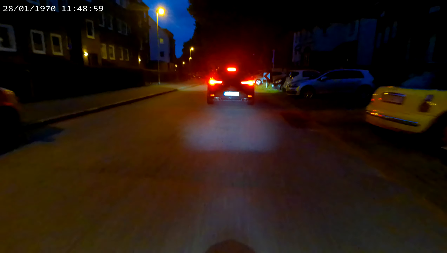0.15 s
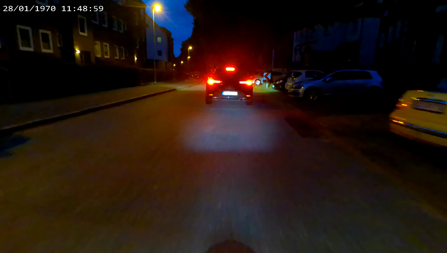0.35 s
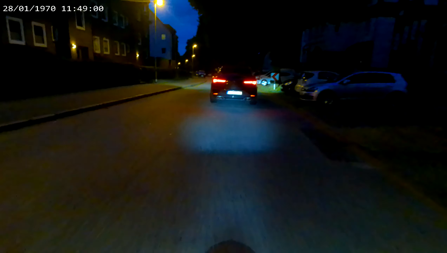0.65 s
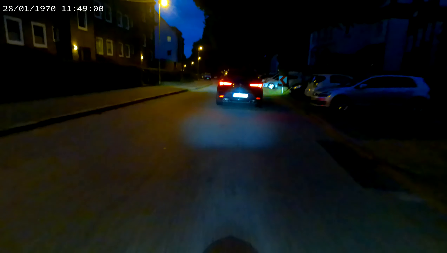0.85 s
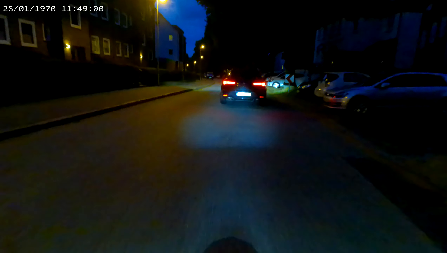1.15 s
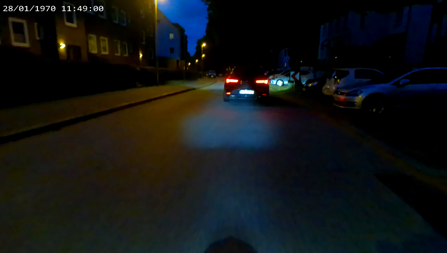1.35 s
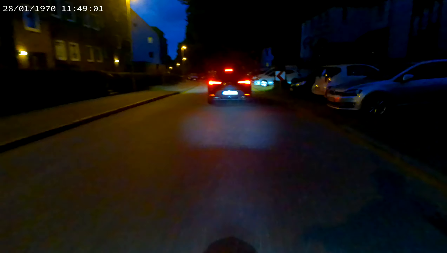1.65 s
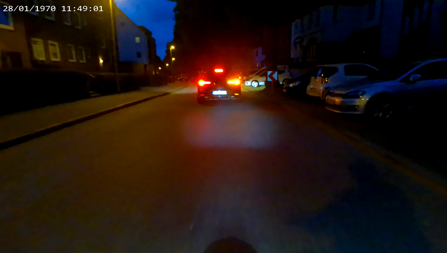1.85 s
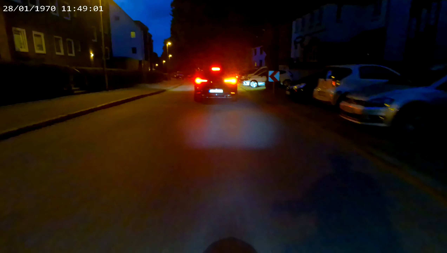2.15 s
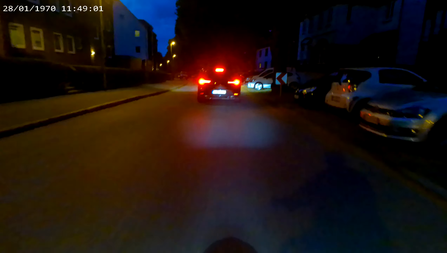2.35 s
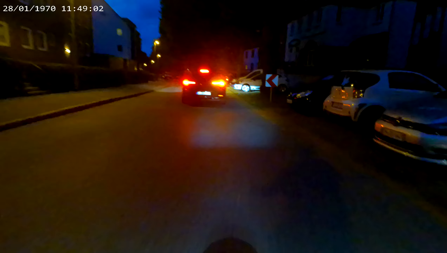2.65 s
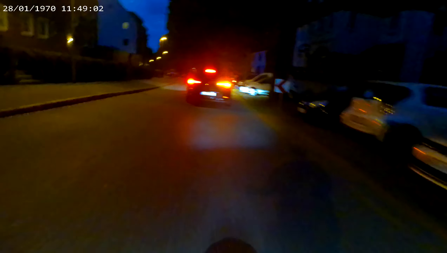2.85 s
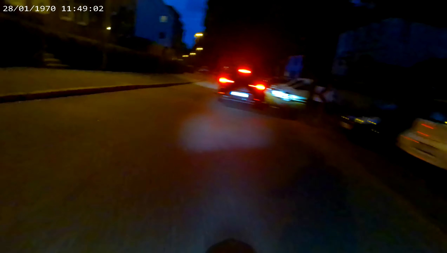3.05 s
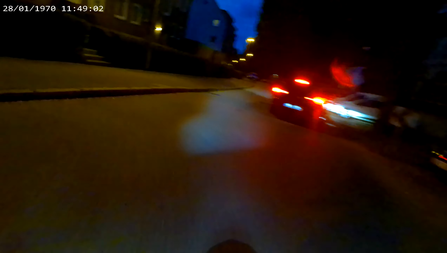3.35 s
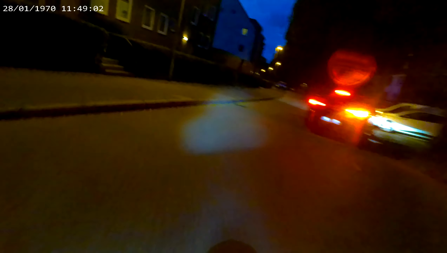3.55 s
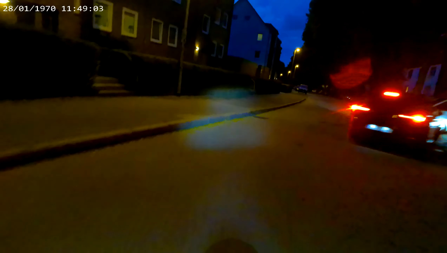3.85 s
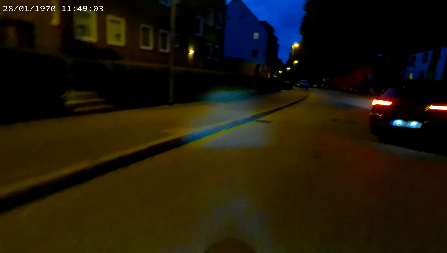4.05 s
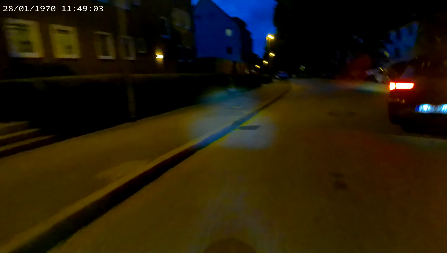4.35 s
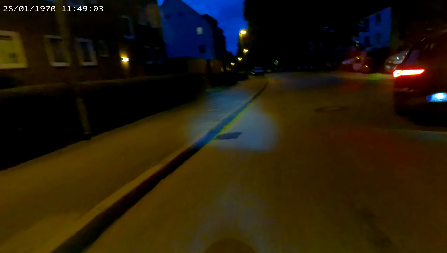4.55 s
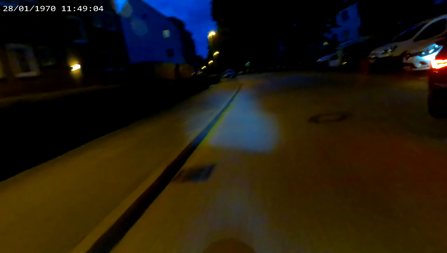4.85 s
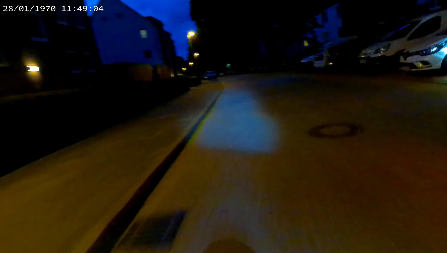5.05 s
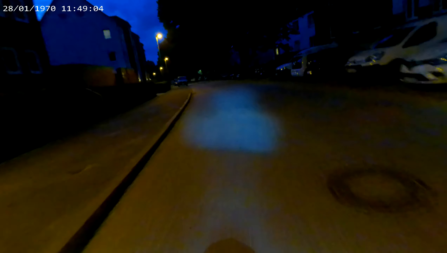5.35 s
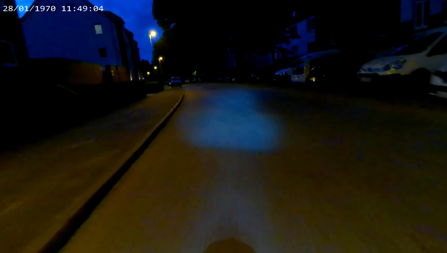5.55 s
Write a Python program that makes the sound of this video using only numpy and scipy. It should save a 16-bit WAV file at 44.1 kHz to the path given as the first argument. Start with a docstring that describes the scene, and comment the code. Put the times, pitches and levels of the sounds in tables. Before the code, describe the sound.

An electric bike rolls along a street with a low swelling hum, tyre rumble, wind, a brief brake rasp and a few knocks.

```python
"""A low, swelling hum: an electric bike rolls along a street at night, its tyres shaking an on-board camera.
Wind buffets the microphone. Early on a brake rasps and lets go with a thump; loose parts knock a few times.
Halfway through, the motor's drone comes up, sags, then climbs as the bike gathers speed.
The loudest swells overload the camera, whose own faint hiss and buzz lie under everything."""
import sys
import numpy as np
from scipy.fft import rfft, irfft, next_fast_len
from scipy.io import wavfile
from scipy.ndimage import map_coordinates

SR = 44100
rng = np.random.default_rng(int(sys.argv[2]) if len(sys.argv) > 2 else 0)


def generate_wav(signal):
    """Clip the signal to [-1, 1] and save it as 16-bit WAV at the path in sys.argv[1]."""
    frames = np.transpose(np.atleast_2d(signal))
    scaled = np.clip(frames, -1, 1) * 32767
    pcm = np.round(scaled).astype(np.int16)
    wavfile.write(sys.argv[1], SR, pcm)


N = 250929
TIME = np.arange(N) / SR

# Roughness of the asphalt. Each row: time in seconds, level in dB at which it keeps the mount humming.
ROUGHNESS = [(0.1, -18.5), (0.7, -23.5), (1.25, -19), (2.0, -21.5), (2.55, -18.5), (3.2, -20.5), (4.3, -19),
             (5.69, -19.5)]
# Tone of tread patter and brake scrape. Each row: frequency in Hz, relative level in dB.
SCRAPE_SPECTRUM = [(250, -36), (480, -8), (600, 1.5), (800, -4.5), (1500, -2), (1850, 1), (2050, -8.5),
                   (2450, -7.5), (2850, -15), (4500, -25.5), (7000, -60)]


def mount_hum(mode_hz=176.53, width_hz=48, wander_hz=3.5, flutter_db=5, max_swing=0.76):
    """The road keeps the camera mount ringing at one low mode, which swells with every bump."""
    # Uneven patches of road. Each row: centre in seconds, peak in dB, length in seconds.
    bumps = [(0.145, -9, 0.045), (0.22, -7.5, 0.028), (0.49, -12.5, 0.08), (0.855, -5.5, 0.08),
             (1.14, -8.5, 0.051), (1.23, -7.5, 0.056), (1.35, -7, 0.026), (1.53, -11, 0.052),
             (2.145, -9, 0.093), (2.28, -7.5, 0.043), (2.37, -11, 0.028), (2.64, -9.5, 0.092),
             (2.8, -11, 0.13), (2.93, -12, 0.071), (3.43, -9.5, 0.049), (3.62, -7, 0.019),
             (3.99, -10, 0.041), (4.14, -14, 0.25), (4.425, -4.5, 0.16), (4.648, -3.5, 0.05),
             (4.91, -6.5, 0.056), (5.06, -6, 0.11), (5.185, -2.5, 0.045), (5.266, -5, 0.049),
             (5.355, -6, 0.115), (5.488, -2.5, 0.045), (5.55, -4.5, 0.055), (5.64, -8, 0.073)]
    pitch_hz = mode_hz + wander_hz * wobble(16)
    asphalt = amp(curves(ROUGHNESS)[0] + flutter_db * wobble(26))
    swing = np.minimum(np.hypot(asphalt, swells(bumps)), max_swing)
    ring = swing * np.sin(2 * np.pi * np.cumsum(pitch_hz) / SR)
    # the mode needs a few cycles to build up and to die away
    return filtered(ring, lambda f: 1 / (1 + ((f - mode_hz) / width_hz) ** 4))


def tyres(roll_db=-21.5, drum_db=-48.5, drum_hz=430, drum_width_hz=220):
    """The tyres rumble, their casings drum and the tread patters on the asphalt; all grow with speed."""
    # The bike slows, then gathers speed. Each row: time in seconds, tread level in dB.
    pace = [(0, -41.5), (0.7, -40.5), (1.0, -43), (2.2, -43), (3.6, -40), (4.7, -38), (5.69, -34.8)]
    # Tone of the rumble. Each row: frequency in Hz, relative level in dB.
    roll_spectrum = [(30, -31.5), (60, -2.5), (100, 1.5), (135, 4), (160, 10), (178, 6), (200, 10),
                     (222, 4.5), (255, -2), (290, 0), (328, 0.5), (365, -13), (415, -12.5), (480, -21.5),
                     (800, -23), (1500, -55.5)]
    tread_db, = curves(pace)
    rough_db, = curves(ROUGHNESS)
    faster_db = tread_db - tread_db.mean()
    rougher_db = rough_db - rough_db.mean()
    roll_gain = amp(roll_db + 0.3 * faster_db + 0.36 * rougher_db + 1.35 * wobble(13))
    roll = roll_gain * coloured(noise(), roll_spectrum)
    casing = unit(filtered(noise(), lambda f: resonance(f, drum_hz, drum_width_hz) ** 3))
    drum = amp(drum_db + 2.1 * faster_db) * casing
    tread_gain = amp(tread_db + 1.2 * wobble(45))
    patter = coloured(housing(grains(rate=5000, spread_db=0.5)), SCRAPE_SPECTRUM)
    return roll + drum + tread_gain * patter


def wind(throb_hz=27, wander_hz=3, throb_lift_db=4.5):
    """Slow eddies push on the microphone, over a deep throb that swells in the gusts."""
    # Air on the microphone. Each row: time in seconds, buffet level in dB.
    airflow = [(0, -33), (0.6, -31), (1.4, -26.5), (2.1, -31.5), (3.2, -33), (4.4, -33), (5.1, -26.5),
               (5.69, -23.5)]
    # Gusts. Each row: centre in seconds, peak in dB, length in seconds.
    gusts = [(0.14, -18, 0.16), (1.03, -15, 0.35), (1.6, -10, 0.16), (4.83, -13, 0.12)]
    # Tone of the buffeting. Each row: frequency in Hz, relative level in dB.
    buffet_spectrum = [(10, -12), (25, 3.5), (43, 12.5), (58, 4.5), (110, -8), (300, -53)]
    eddy_db, = curves(airflow)
    pitch_hz = throb_hz + wander_hz * wobble(14)
    throb = unit(np.sin(2 * np.pi * np.cumsum(pitch_hz) / SR))
    depth = np.hypot(amp(eddy_db + throb_lift_db + 3 * wobble(26)), swells(gusts, edge=1.3))
    eddies = amp(eddy_db + 2 * wobble(9)) * coloured(noise(), buffet_spectrum)
    return depth * throb + eddies


def motor(second_db=-12, third_db=-19, flutter_db=4.1):
    """The motor under load: a low, unsteady drone with two weak overtones."""
    # The motor's run. Each row: time in seconds, pitch in Hz, level in dB.
    run = [(2.6, 126, -49), (2.9, 122, -24), (3.1, 120, -30), (3.25, 99, -36.5), (3.6, 108, -33.5),
           (4.2, 113, -28), (4.7, 122, -25.5), (5.1, 129, -31.5), (5.69, 154, -32)]
    pitch_hz, db = curves(run)
    phase = 2 * np.pi * np.cumsum(pitch_hz * (1 + .02 * wobble(30))) / SR
    drone = np.sin(phase) + amp(second_db) * np.sin(2 * phase) + amp(third_db) * np.sin(3 * phase)
    return amp(db + flutter_db * wobble(14)) * unit(drone)


def brake(start_db=-34, squeeze_db_per_s=5, let_go_s=0.80, release_s=0.048):
    """The pad catches and slips in dense grains and the disc rings faintly, both rising until release."""
    # Tone of the pad's rasp. Each row: frequency in Hz, relative level in dB.
    pad_spectrum = [(450, -42), (600, -11), (1000, -15.5), (1400, -11), (1700, 5), (1880, 2), (2030, -9.5),
                    (2400, -3), (2850, -28.5), (5600, -30.5)]
    # High modes of the disc. Each row: frequency in Hz, width in Hz, relative level in dB.
    modes = [(3920, 220, -3.5), (4400, 130, -5), (4610, 210, 0)]
    # The pad grabs with a lower scrape. Each row: centre in seconds, peak in dB, length in seconds.
    grabs = [(0.48, -35.5, 0.15)]
    squeeze_db = squeeze_db_per_s * np.minimum(TIME, let_go_s)
    rasp = coloured(housing(grains(rate=3200, spread_db=0)), pad_spectrum)
    scrape = coloured(housing(noise()), SCRAPE_SPECTRUM)
    disc = filtered(noise(), lambda f: sum(amp(db) * resonance(f, hz, w) ** 2 for hz, w, db in modes))
    ringing = amp(-38.5 + 1.5 * squeeze_db + 4 * wobble(30)) * unit(disc)
    held = np.clip(1 - (TIME - let_go_s) / release_s, 0, 1)
    chatter = amp(start_db + 1.26 * wobble(50))
    return held * chatter * (amp(squeeze_db) * rasp + ringing) + swells(grabs) * scrape


def frame_thump(centre_s=0.807, peak_db=-14.5, half_length_s=0.042):
    """The whole frame gives a dull thump as the brake lets go."""
    push = amp(peak_db) * np.exp(-((TIME - centre_s) / half_length_s) ** 2)
    spectrum = [(25, -11.5), (60, -7), (95, 0), (140, -6), (320, -16), (600, -67), (1500, -75)]
    return push * coloured(noise(), spectrum)


def knocks(crack_t60=0.015):
    """Each contact rings the loose parts briefly; hard ones favour high modes and add a bright crack."""
    # Contacts. Each row: start in seconds, gain in dB, time to ring down 60 dB in seconds,
    # hardness as a tilt in dB per octave, crack in dB relative to that gain.
    contacts = [(0.790, -22, 0.023, 5, -29), (1.553, -20.5, 0.0096, 12, -6.5), (1.86, -34, 0.019, 8.5, -27),
                (2.289, -32, 0.019, 8, -27), (2.581, -18, 0.014, 3, -28), (2.585, -13, 0.025, 1, -36),
                (2.5889, -19, 0.054, -4, -40.5)]
    # Modes of the loose parts. Each row: frequency in Hz, relative level in dB.
    part_modes = [(650, -3.5), (770, -4.5), (825, -2.5), (1030, -5.5), (1350, -8.5), (1590, -11),
                  (1820, -14), (2330, -23.5)]
    # Tone of the crack. Each row: frequency in Hz, relative level in dB.
    crack_spectrum = [(600, -13), (1300, 6.5), (1900, -3), (2400, 0.5), (3400, -12), (5000, -10),
                      (6000, -26.5), (8000, -27.5), (12000, -44)]
    rings, crack_gain = np.zeros((2, N + SR))
    t = np.arange(SR // 8) / SR
    for s, db, t60, tilt, crack_db in contacts:
        start = round(s * SR)
        modes = [(hz, amp(level + tilt * np.log2(hz / 1000) + rng.normal())) for hz, level in part_modes]
        ring = sum(gain * np.sin(2 * np.pi * hz * t + rng.uniform(0, 2 * np.pi)) for hz, gain in modes)
        rings[start:][:len(t)] += amp(db - 60 * t / t60) * ring * (1 - np.exp(-t / .0005)) ** 2
        crack_gain[start:][:len(t)] += amp(db + crack_db - 60 * t / crack_t60) * (1 - np.exp(-t / .0003))
    return rings[:N] + crack_gain[:N] * coloured(noise(), crack_spectrum)


def grit(t60=0.034):
    """A small stone, flicked by a tyre, ticks against the bike."""
    # Stone hits. Each row: start in seconds, level in dB.
    hits = [(4.279, -51), (4.283, -51)]
    ticks = sum((TIME >= s) * amp(db - 60 * np.abs(TIME - s) / t60) for s, db in hits)
    spectrum = [(2500, -24), (4300, -1.5), (5200, 3.5), (6300, -10.5), (8000, -29.5)]
    return ticks * coloured(noise(), spectrum)


def electronics(frame_hz=30.05, buzz_hz=6700, hiss_db=-59.5, surge_s=0.62, surge_every_s=1.035):
    """The camera buzzes faintly with each picture it takes; its hiss lifts about once a second."""
    # Strength of the buzz. Each row: time in seconds, level in dB.
    buzz_levels = [(0, -74.5), (1.2, -68.5), (1.9, -74), (5.69, -74)]
    # Tone of the hiss. Each row: frequency in Hz, relative level in dB.
    hiss_spectrum = [(100, -1.7), (3000, -0.1), (5000, 1.3), (7500, -1), (9000, -2), (11300, -1),
                     (12300, 1.6), (15700, 3)]
    gate = (.5 + .5 * np.cos(2 * np.pi * frame_hz * TIME)) ** 3
    buzz = unit(gate * filtered(noise(), lambda f: resonance(f, buzz_hz, width=600) ** 2))
    surge = np.abs(np.cos(np.pi * (TIME - surge_s) / surge_every_s)) ** 20
    hiss = amp(hiss_db + 2 * surge + 1.1 * wobble(60)) * coloured(noise(), hiss_spectrum)
    return amp(curves(buzz_levels)[0]) * buzz + hiss


def housing(x):
    """Vibration heard through the resonances of the camera housing."""
    # Housing modes. Each row: frequency in Hz, width in Hz, gain in dB.
    modes = [(584, 76, 0.5), (699, 57, 0.5), (1033, 70, 0), (1284, 100, -2), (1614, 150, -1.5),
             (1870, 180, -13)]
    power = lambda f: sum(np.abs(amp(db) * resonance(f, hz, width)) ** 2 for hz, width, db in modes)
    return filtered(x, lambda f: np.sqrt(power(f)))


def grains(rate, spread_db):
    """Tiny random impacts of uneven size, rate a second."""
    return unit((rng.random(N) < rate / SR) * noise() * amp(spread_db * noise()))


def swells(rows, edge=3.0):
    """A rounded rise and fall of gain for each row of centre time, peak dB and length."""
    return sum(amp(db) * .5 ** (np.abs(2 * (TIME - s) / length) ** edge) for s, db, length in rows)


def curves(rows):
    """One value per sample for each column after the time."""
    s, *cols = np.transpose(rows)
    return [np.interp(TIME, s, c) for c in cols]


def wobble(rate):
    """A smooth random curve, rate knots a second."""
    return map_coordinates(rng.standard_normal(4000), [TIME * rate], mode="wrap")


def coloured(x, spectrum):
    """x shaped by (Hz, dB) points and falling steeply above the last, at rms 1."""
    hz, db = np.transpose(spectrum)
    fall = lambda f: np.maximum(f / hz[-1], 1) ** -4
    return unit(filtered(x, lambda f: amp(np.interp(np.log(f + 1), np.log(hz), db)) * fall(f)))


def filtered(x, response):
    """x through a complex frequency response."""
    m = next_fast_len(N + SR // 2)
    return irfft(rfft(x, m) * response(np.fft.rfftfreq(m, 1 / SR)), m)[:N]


def resonance(f, hz, width):
    """Response of one damped mode."""
    return 1j * f * width / (hz * hz - f * f + 1j * f * width)


def noise():
    """Fresh white noise."""
    return rng.standard_normal(N)


def amp(db):
    """Decibels to gain."""
    return 10 ** (np.asarray(db) / 20)


def unit(x):
    """x scaled to rms 1."""
    return x / np.sqrt(np.mean(np.abs(x) ** 2) + 1e-20)


def scene():
    """Everything reaches the one microphone through the frame or the air close by."""
    ride = mount_hum() + tyres() + motor() + brake() + wind()
    return (ride + knocks() + grit() + frame_thump() + electronics())[None]


def record(dry, offset=-0.028, ceiling=0.705, top_hz=15720):
    """The camera's input sits off centre and crackles on the tallest swells; the top treble is cut."""
    clipped = np.clip(dry[0] + offset, -ceiling, ceiling)
    return filtered(clipped, lambda f: f < top_hz)[None]


dry = scene()
out = record(dry)
generate_wav(out)
```